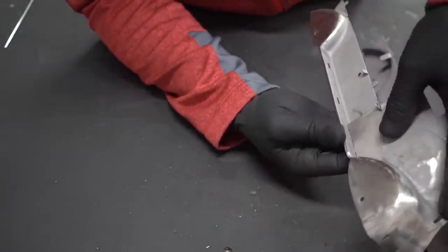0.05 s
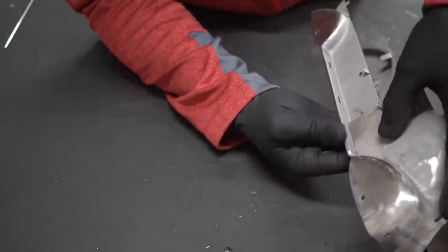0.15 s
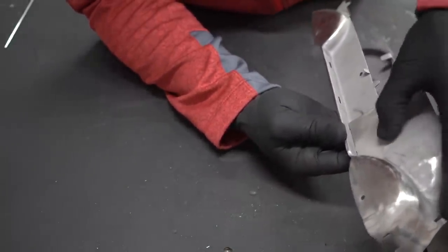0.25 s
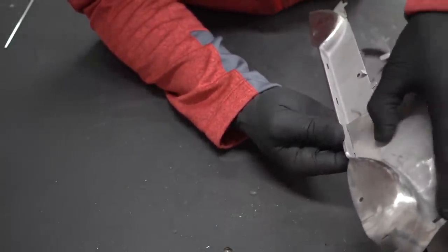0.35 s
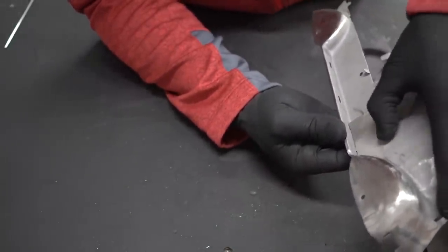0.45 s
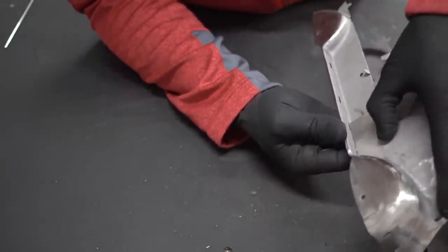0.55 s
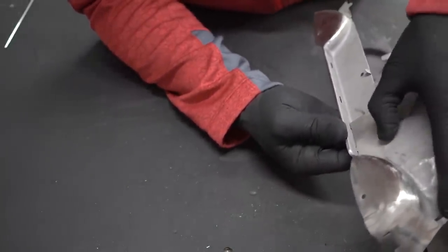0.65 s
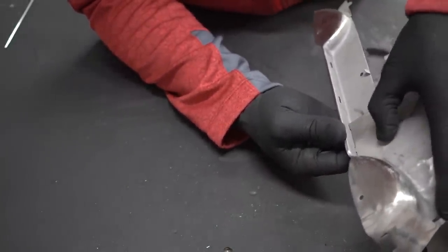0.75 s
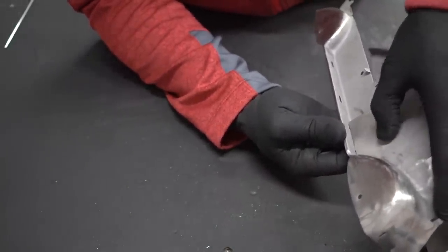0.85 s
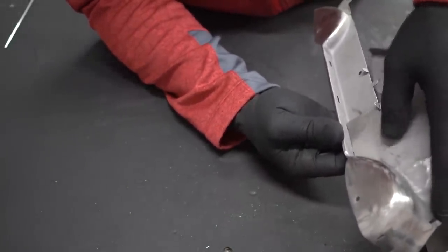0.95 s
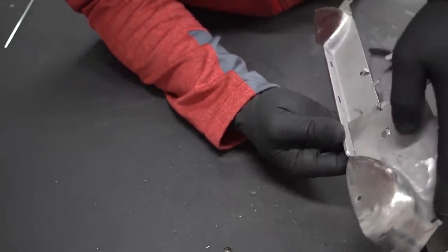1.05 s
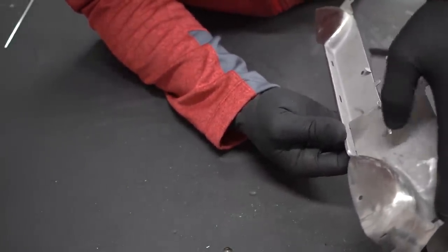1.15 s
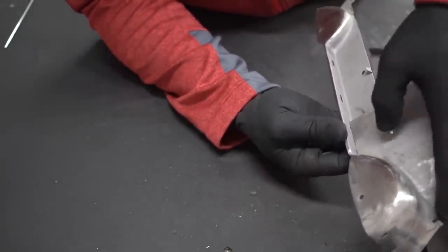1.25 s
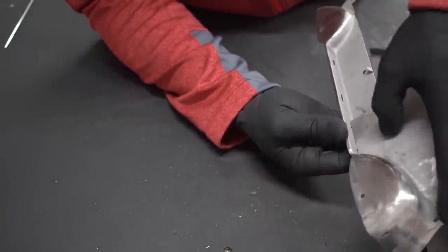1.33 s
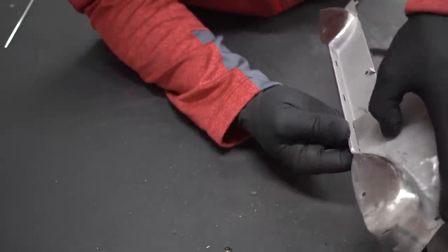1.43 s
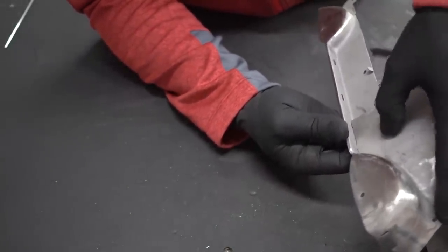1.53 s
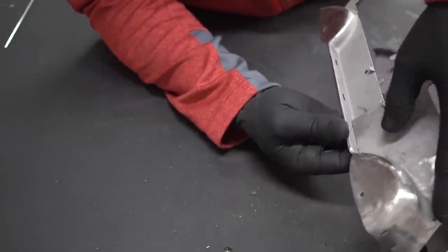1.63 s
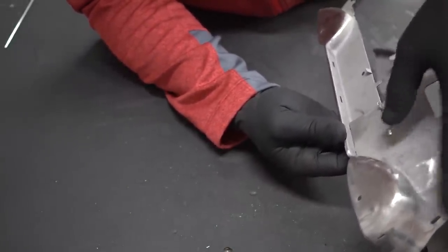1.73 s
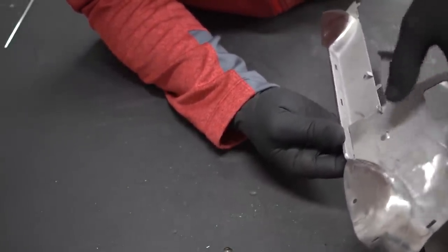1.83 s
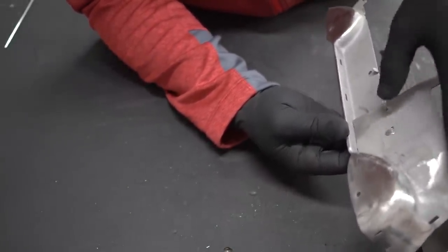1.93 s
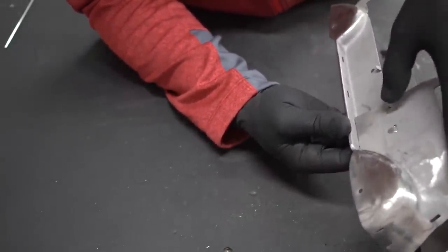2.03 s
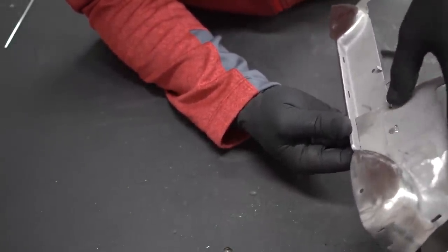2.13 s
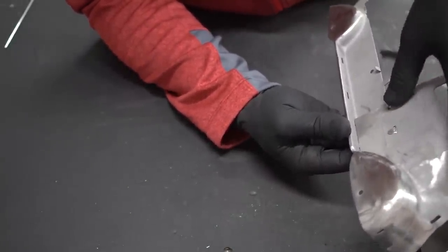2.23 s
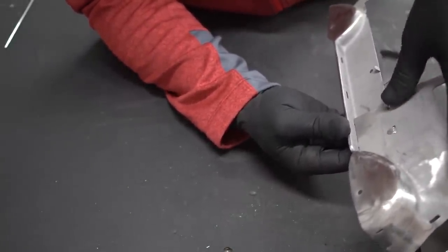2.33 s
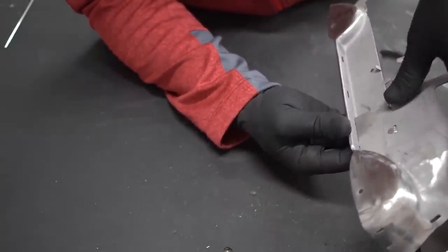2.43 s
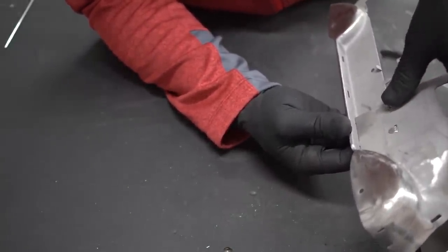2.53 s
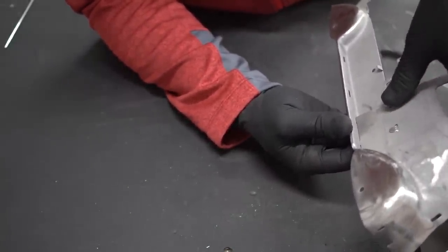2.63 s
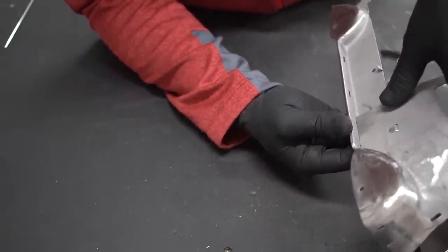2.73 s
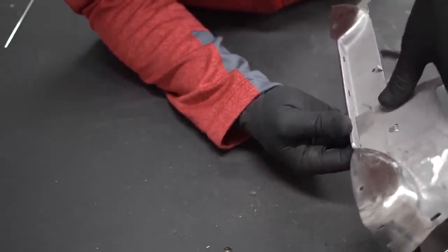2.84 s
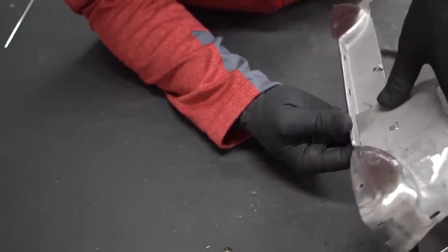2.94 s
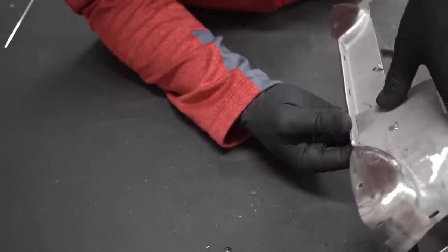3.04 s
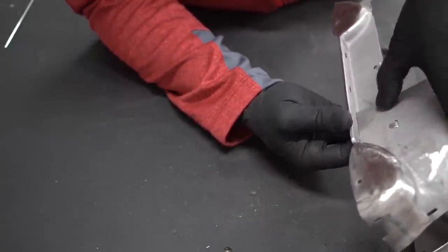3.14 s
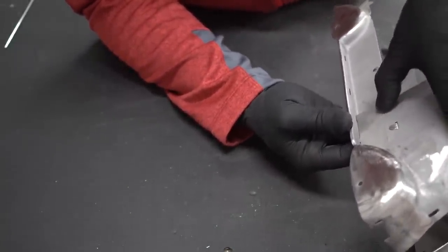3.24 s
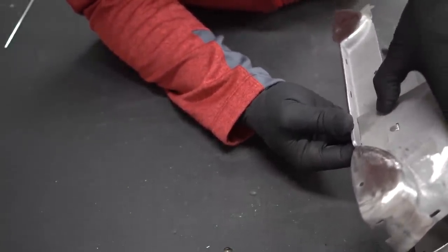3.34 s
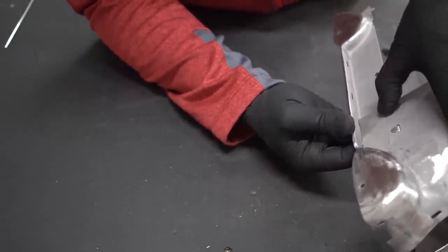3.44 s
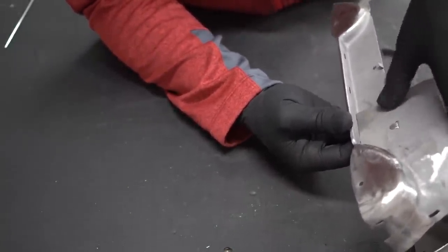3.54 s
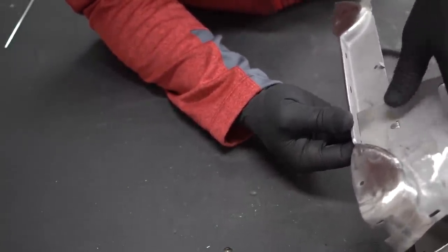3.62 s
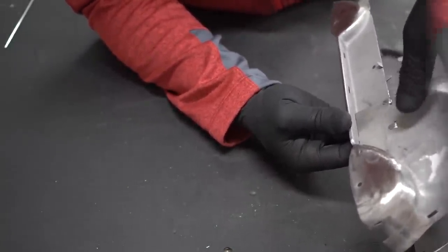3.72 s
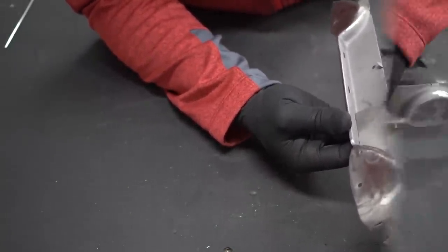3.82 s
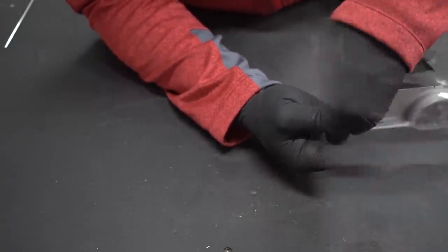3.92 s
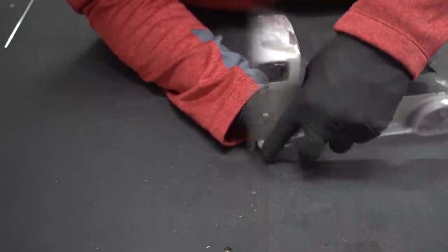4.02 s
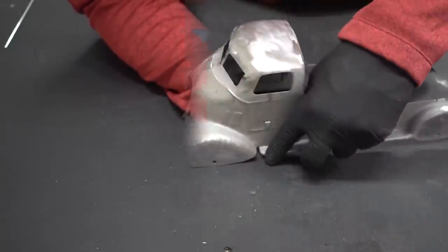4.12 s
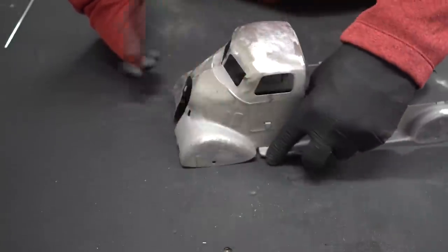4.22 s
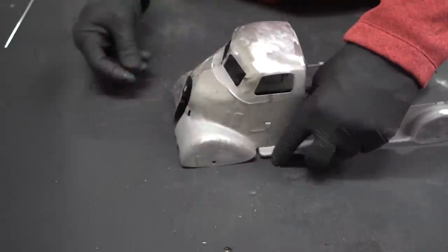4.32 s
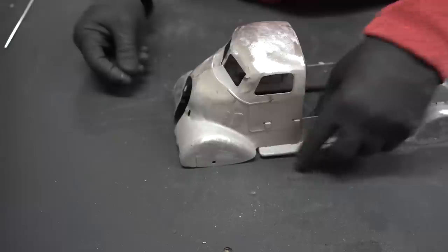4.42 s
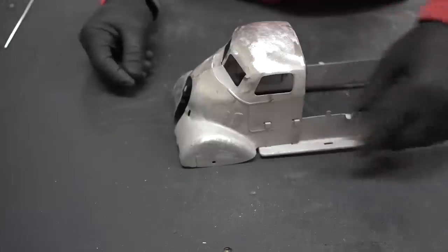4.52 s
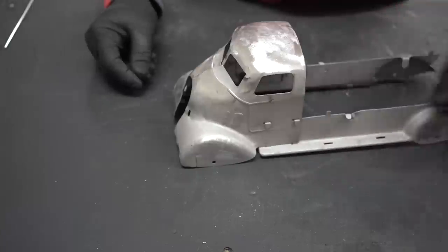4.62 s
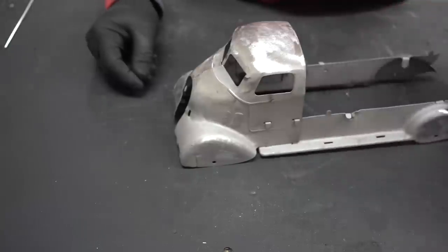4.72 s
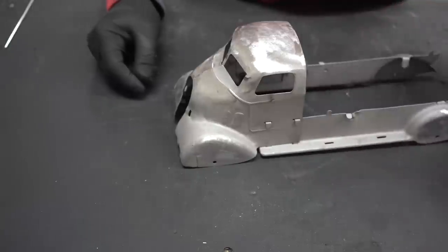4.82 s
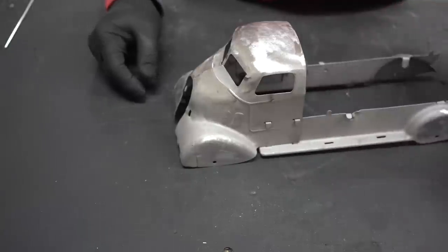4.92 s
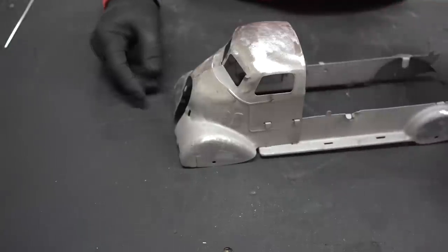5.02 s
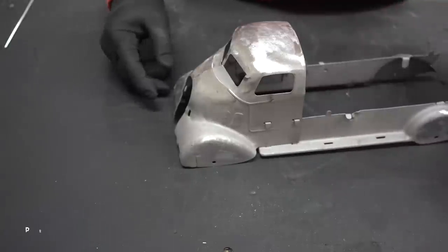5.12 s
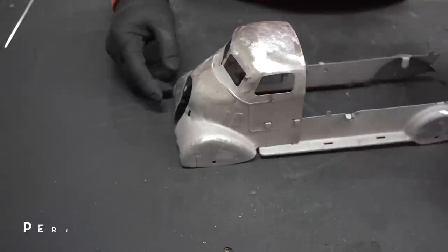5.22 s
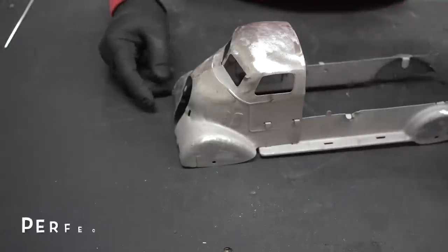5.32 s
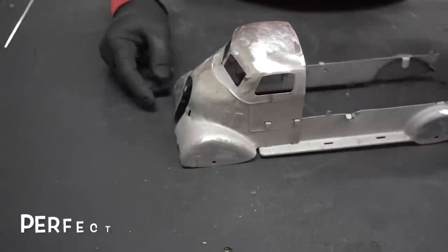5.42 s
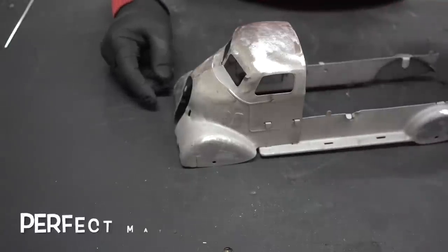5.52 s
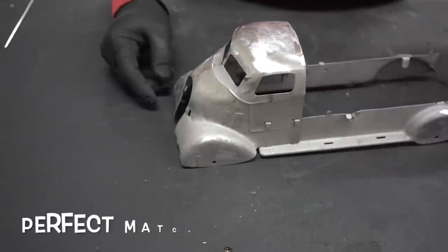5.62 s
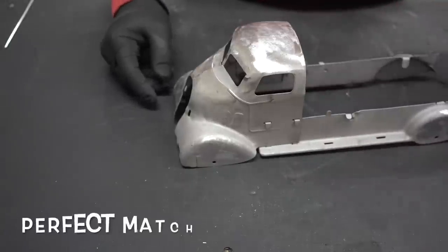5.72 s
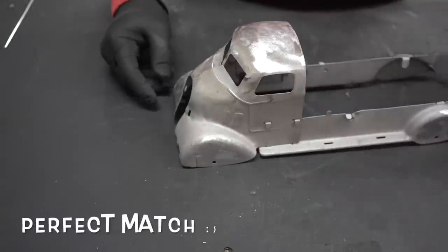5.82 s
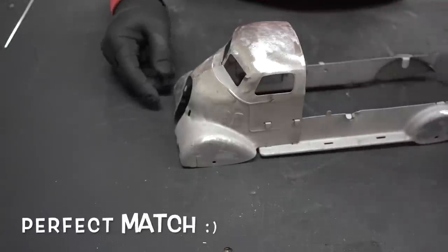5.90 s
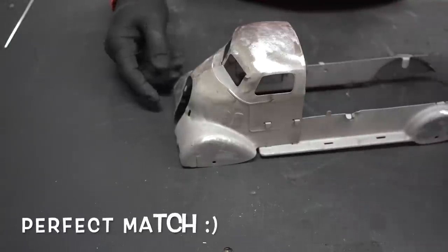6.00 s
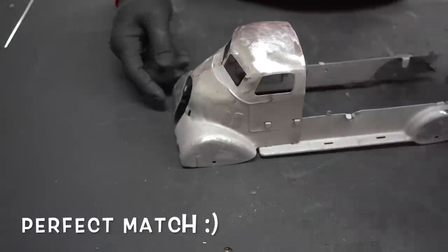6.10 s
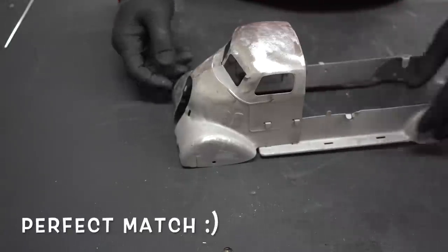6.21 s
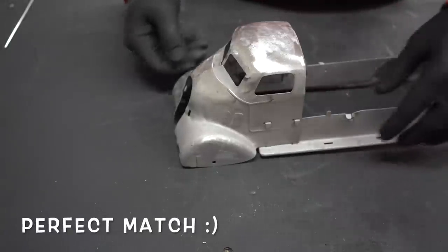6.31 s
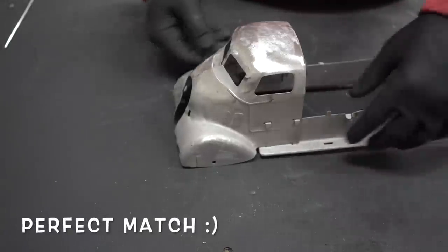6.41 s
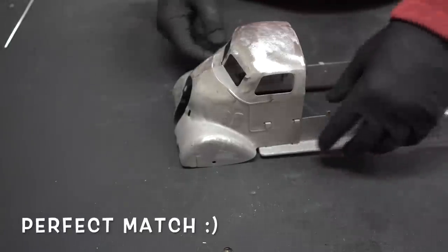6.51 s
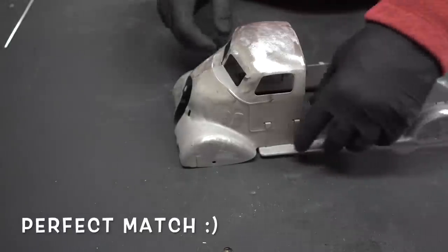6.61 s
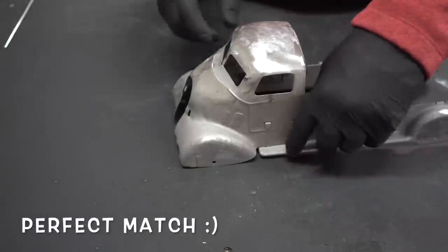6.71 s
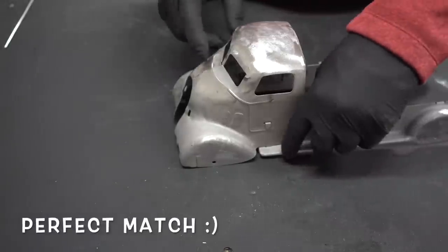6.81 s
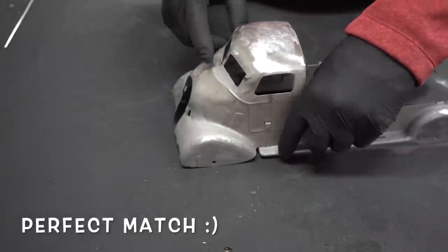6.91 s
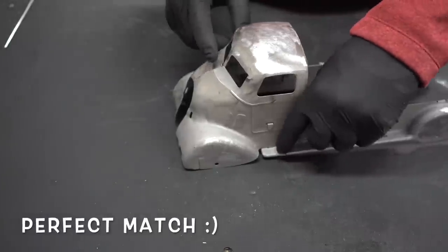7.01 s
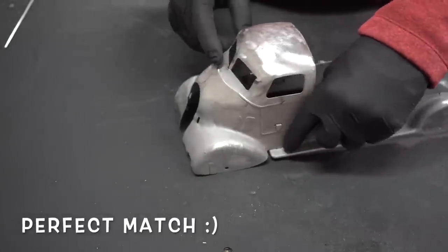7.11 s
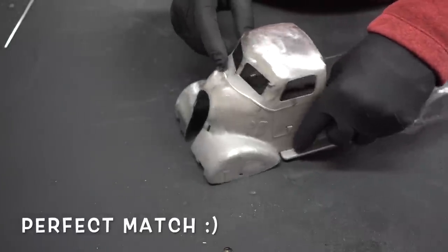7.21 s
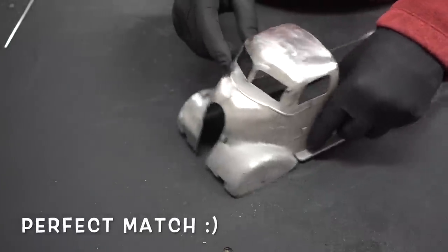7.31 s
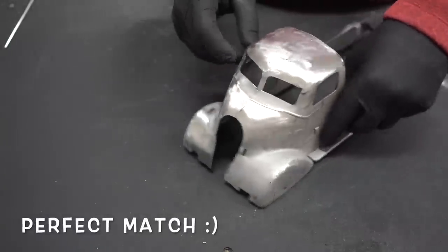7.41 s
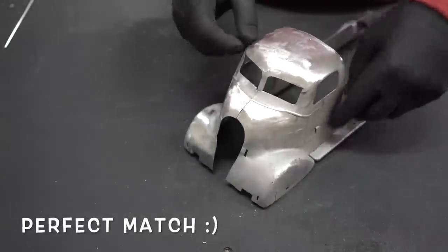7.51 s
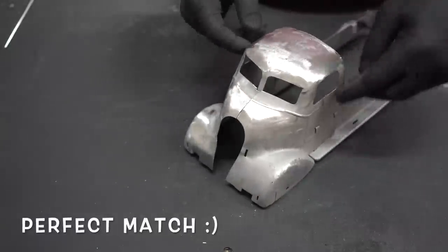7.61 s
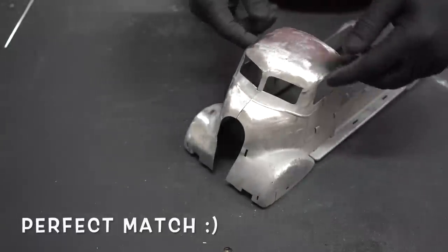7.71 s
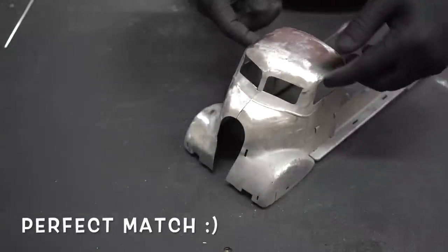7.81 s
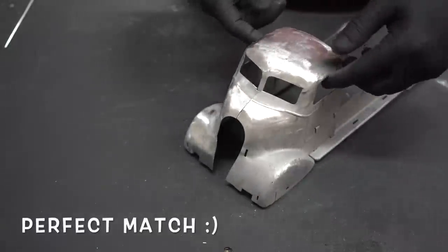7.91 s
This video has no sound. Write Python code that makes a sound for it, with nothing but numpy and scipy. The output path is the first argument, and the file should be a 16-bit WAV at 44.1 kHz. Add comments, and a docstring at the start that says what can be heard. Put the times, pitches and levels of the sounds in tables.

```python
"""Bending a tin truck

Gloved hands bend the tabs of a thin steel toy truck: tabs snap as noise bursts in the bands of the sheet.
The shell flexes, creaks and bumps (slip pulses and thuds); the truck is set down and dragged in jerks.
A heavy steel tool slides over the bench mat and rings against another as a few wavering tones.
A lively workshop answers with a noise tail and a faint hum, heard by a close pair of microphones.
Table levels are relative: each function balances its parts. A t60 is the time to fade by 60 dB."""
import sys
import numpy as np
from scipy import signal
from scipy.fft import rfft, irfft, next_fast_len
from scipy.io import wavfile
from scipy.ndimage import uniform_filter1d, map_coordinates

SR = 44100
rng = np.random.default_rng(int(sys.argv[2]) if len(sys.argv) > 2 else 0)


def to_wav(s):
    """Save 16-bit WAV."""
    ch = np.atleast_2d(s).T  # columns
    pcm = np.round(np.clip(ch, -1, 1) * 32767)  # PCM
    wavfile.write(sys.argv[1], SR, pcm.astype(np.int16))


N = 350595  # length of the scene [samples]


def amp(db):
    """Turn decibels into a gain."""
    return 10 ** (np.asarray(db) / 20)


def unit(x):
    """Scale a sound to an rms of 1."""
    return x / np.sqrt(np.mean(x ** 2) + 1e-20)


def along(points, hz):
    """Read a curve of (frequency, value) points on a logarithmic frequency axis."""
    point_hz, values = np.transpose(points)
    return np.interp(np.log(hz + 1), np.log(point_hz), values)


def filtered(x, response):
    """Multiply the spectrum of x by a function of frequency."""
    n = x.shape[-1]
    padded = next_fast_len(n + 8192)  # spare silence, so that the end does not spill into the start
    spectrum = rfft(x, padded) * response(np.fft.rfftfreq(padded, 1 / SR))
    return irfft(spectrum, padded)[..., :n]


def coloured(x, tone):
    """Give x the tone colour of a table, at rms 1."""
    return unit(filtered(x, lambda f: amp(along(tone, f))))


def resonated(x, modes):
    """Let x excite (frequency, width, level) resonances with alternating signs, at rms 1."""
    def response(f):
        total = 0
        for k, (hz, width, db) in enumerate(modes):
            damping = 1j * f * width
            total = total + (-1) ** k * amp(db) * damping / (hz * hz - f * f + damping)
        return total
    return unit(filtered(x, response))


def band(x, low_hz, high_hz):
    """Keep only the frequencies between two limits, with gentle edges."""
    return signal.sosfilt(signal.butter(2, [low_hz, high_hz], "band", fs=SR, output="sos"), x)


def radiated(x, low_hz):
    """The bench top is too small to radiate deep bass."""
    return signal.sosfilt(signal.butter(6, low_hz, "high", fs=SR, output="sos"), x)


def slips(rate, spread_db, size=N):
    """Stick-slip: tiny pulses of uneven size at random moments, on average rate a second."""
    chance, strength = rng.random(size), rng.standard_normal(size)
    heights = amp(spread_db * np.clip(strength, -2, 2))
    signs = rng.choice([-1, 1], size)
    return unit((chance < rate / SR) * heights * signs)


def wobble(rate):
    """A smooth random curve through rate random points a second."""
    points = rng.standard_normal(int(N * rate / SR) + 4)
    return map_coordinates(points, [np.arange(N) * rate / SR], mode="mirror")


def add(track, s, sound):
    """Mix a sound into a track at time s."""
    i = round(s * SR)
    track[..., i:i + sound.shape[-1]] += sound[..., :N - i]


def panned(x, pan_db):
    """Place a sound between left and right; pan_db is how much louder the left is."""
    return x * amp([[pan_db / 2], [-pan_db / 2]])


def roaming(x, patchy_db):
    """As the contact moves, it favours now some resonances and now others."""
    z = signal.stft(x, nperseg=512)[2]
    patches = rng.standard_normal(z.shape[-2:])
    patches = uniform_filter1d(patches, size=4, axis=0)  # smooth over frequency
    patches = uniform_filter1d(patches, size=7, axis=1)  # smooth over time
    moved = signal.istft(z * amp(patchy_db * unit(patches)), nperseg=512)[1][..., :N]
    return x.std() * unit(moved)


ATTACK_S = 0.013  # a hand takes this long to set the steel moving


def stroke(t, length, release_s):
    """One move of a hand, t seconds after its start: attack, hold, then a release with this t60."""
    return np.clip(t / ATTACK_S, 0, 1) * amp(-60 * np.maximum(t - length, 0) / release_s)


def strokes(rows, release_s, slope_db=0):
    """The gain of (time, length, level) moves that change by slope_db a second while held."""
    power, t = np.zeros(N), np.arange(SR) / SR
    for s, length, db in rows:
        level = amp(db + slope_db * np.minimum(t, length))
        add(power, s, (level * stroke(t, length, release_s)) ** 2)
    return np.sqrt(power)


# how alike diffuse sound is at left and right: (frequency [Hz], likeness [1 = the same])
ALIKE = [(25, 1), (60, .995), (125, 1), (280, 0.97), (550, 0.73), (1200, 0.38), (4000, 0), (12000, 0)]


def diffuse(pair):
    """Two unrelated signals become left and right, alike in the bass."""
    def shares(f):
        turn = np.arccos(np.clip(along(ALIKE, f), -1, 1)) / 2
        return np.array([np.cos(turn), np.sin(turn)])
    mid, side = filtered(pair, shares)
    return np.array([mid + side, mid - side])


# how long the workshop rings: (frequency [Hz], t60 [s])
ROOM = [(100, 0.65), (260, 0.55), (700, 0.85), (1840, 0.73), (4850, 0.61), (12800, 0.41)]
# the cluttered wall behind the bench: (delay [s], spread [s], twice its strength over the tail [ratio])
WALL = (0.0081, 0.0026, 2)


def in_room(x, wet_db, lag=0):
    """Direct sound, a wall echo and a fading noise tail; the left microphone hears it lag seconds late."""
    hz, t, z = signal.stft(rng.standard_normal((2, SR)), SR, nperseg=256)
    fading = z * amp(-60 * t / along(ROOM, hz)[:, None])
    tail = diffuse(signal.istft(fading, SR, nperseg=256)[1])
    age = np.arange(tail.shape[1]) / SR
    delay, spread, strength = WALL
    build_up = 1 - np.exp(-age / 0.0058)
    wall_echo = strength * np.exp(-((age - delay) / spread) ** 2) / 2
    tail = tail * (build_up + wall_echo)
    tail = tail / np.linalg.norm(tail[0])
    source = np.atleast_2d(x).mean(axis=0)
    heard = x + amp(wet_db) * signal.fftconvolve(source[None], tail, axes=1)[:, :N]
    sides = np.array([[-1], [1]])  # half the lag delays the left, half advances the right
    return filtered(heard, lambda f: np.exp(1j * np.pi * f * lag * sides))


# tone of the quiet workshop: (frequency [Hz], level [dB])
AIR_TONE = [(12, -56.5), (20, -4.5), (107, 1.5), (193, -9), (248, 0.5), (319, -10), (367, -6.5),
            (446, -14.5), (780, -12.5), (1190, -16.5), (1400, -16.5), (2910, -20), (12800, -25.5),
            (14700, -26), (16000, -28)]


def air():
    """The quiet workshop: soft noise all around and a faint machine hum of three narrow resonances."""
    hum_modes = [(60.0, 3.8, -9), (142.5, 4.5, 2.0), (244.3, 7.1, 4.0)]  # (Hz, width Hz, dB)
    hum = resonated(rng.standard_normal(N), hum_modes)
    hush = coloured(diffuse(rng.standard_normal((2, N))), AIR_TONE)
    return amp(-53) * hush + amp(-66) * hum


# brief thin, high hisses of a glove or sleeve brushing past: (time [s], length [s], level [dB])
SWISHES = [(.265, .012, -58), (5.44, .025, -53), (5.595, 0.06, -48)]


def high_hisses():
    """Light rubbing of a glove or sleeve makes many tiny slips, heard as a thin, high hiss."""
    touch = strokes(SWISHES, release_s=0.1)
    swish = unit(band(slips(rate=3600, spread_db=10), 7400, 21000))
    return in_room(touch * swish, wet_db=1)


# the small bending tool brushing the mat as it is put aside: (time [s], length [s], level [dB])
SET_ASIDE = [(4.735, 0.081, -54), (4.815, 0.022, -46.5)]
# resonances of that tool: (frequency [Hz], width [Hz], level [dB])
SMALL_TOOL = [(2120, 91, -2), (3430, 31, -1), (4516, 23, 3), (5000, 40, -2), (5450, 25, -2), (9060, 55, -3),
              (10440, 63, -1), (12150, 65, -16), (14800, 200, -10)]
# steel rubbing on steel: (time [s], length at half height [s], frequency [Hz], level [dB])
SQUEAKS = [(0.218, 0.018, 3120, -60), (2.47, 0.16, 2460, -66.5), (2.627, 0.041, 3020, -64.5),
           (3.888, 0.026, 4200, -47), (4.173, 0.22, 5510, -59), (7.234, 0.021, 6500, -25)]


def light_steel():
    """Brief squeaks of the shell in narrow bands, and the bending tool singing faintly as it is put aside."""
    touch = strokes(SET_ASIDE, release_s=0.26)
    out = touch * resonated(slips(rate=1600, spread_db=8), SMALL_TOOL)
    for s, length, hz, db in SQUEAKS:
        swell = np.hanning(round(2 * length * SR))
        squeak = resonated(rng.standard_normal(len(swell)), [(hz, 5 / length, 0)])
        add(out, s - length / 2, amp(db) * swell * squeak)
    return in_room(out, wet_db=-7.5)


# hands pressing on the shell so that it flexes: (time [s], length [s], level [dB])
PRESSES = [(0.0, .03, -43.5), (.33, 0.14, -50), (.83, 0.077, -43), (1.01, 0.057, -48.5),
           (1.27, 0.049, -45.5), (1.42, 0.055, -40.5), (1.55, 0.12, -42.5), (1.84, 0.056, -31.5),
           (2.0, 0.037, -43.5), (2.21, .04, -44), (2.36, 0.038, -49.5), (2.54, 0.035, -52),
           (2.73, 0.022, -59), (3.36, 0.074, -63), (3.53, 0.15, -41.5), (4.03, .05, -40),
           (4.76, 0.025, -47), (4.97, 0.048, -47.5), (5.23, 0.12, -58)]
# tone of the flexing shell: (frequency [Hz], level [dB])
FLEX_TONE = [(41, -46), (70, -55.5), (96, -48), (114, 14.5), (125, 2.5), (166, -11.5), (240, -4),
             (286, -18.5), (329, -7.5), (500, -15), (650, -61), (1100, -120)]
# glove and tool rubbing on the steel, and at 3.631 s a tab rattling as it slides free:
# (time [s], length [s], panel level [dB], hiss level [dB], panel pitch at that moment [ratio])
RUBS = [(0.761, 0.066, -45.5, -47.5, 1.16), (0.849, .012, -40, -43, 1), (1.023, 0.044, -49, -75, 1.15),
        (1.559, 0.036, -43, -48.5, 0.85), (1.592, 0.041, -42, -38, 1.93), (1.658, .12, -48.5, -50.5, 1.65),
        (1.782, .012, -41, -53, 0.51), (1.807, 0.013, -37, -44, 0.49), (1.83, 0.04, -49, -49, 1.14),
        (1.881, 0.11, -51.5, -55, 1.24), (2.175, 0.035, -53, -47, 1.1), (2.589, 0.059, -63, -55.5, 0.98),
        (2.918, 0.056, -49.5, -59, 1.04), (3.099, 0.017, -50, -44, 0.93), (3.151, .14, -53, -69, 1.18),
        (3.631, 0.089, -40, -33, 2.1), (4.817, 0.044, -48.5, -49, 0.96), (4.984, .03, -50.5, -60, 0.99),
        (5.061, 0.11, -63.5, -63, 1.38), (6.832, 0.15, -65, -55.5, 1.01), (7.015, 0.095, -39.5, -49, .85),
        (7.882, 0.046, -65, -51.5, 1.2)]
# tone of the rubbing hiss: (frequency [Hz], level [dB])
HISS_TONE = [(1200, -32), (2500, 0.5), (4000, 9.5), (7000, 12), (12000, 9.5), (16000, 5)]
# resonances of the truck's broad panels, also heard in the bumps: (frequency [Hz], width [Hz], level [dB])
PANEL = [(371, 110, 10), (740, 71, 13.5), (917, 26, 4), (1270, 190, 3.5), (1650, 41, -0.5),
         (2396, 140, 1.5)]
# resonances of the truck's steel, also heard in drag and snaps: (frequency [Hz], width [Hz], level [dB])
TIN = [(2060, 190, -11.5), (3313, 79, 2.5), (3580, 36, 6), (4140, 360, 2), (5100, 54, -6), (6440, 45, 3),
       (7220, 320, -2), (8140, 99, 4.5), (9300, 67, -5), (11800, 660, -4)]
PRESS_RELEASE_S, RUB_RELEASE_S = 0.27, 0.098  # t60 as the hand eases off
# between presses the hands are never quite still
HOLD_UNTIL_S, HOLD_DB, FIDGET_DB, FIDGETS_PER_S = 4.3, -62, 8, 6.7


def handling():
    """Pressure rocks the shell; glove and tool rub panels that each grip tunes anew; one tab rattles free."""
    t = np.arange(N) / SR
    unsteady = amp(HOLD_DB + FIDGET_DB * wobble(FIDGETS_PER_S))
    holding = unsteady * stroke(t, HOLD_UNTIL_S, PRESS_RELEASE_S)
    flex = np.hypot(holding, strokes(PRESSES, PRESS_RELEASE_S))
    rocking = flex * coloured(slips(rate=360, spread_db=0.5), FLEX_TONE)
    creak, short_t = np.zeros(N), t[:SR // 2]
    for s, length, panel_db, _, ratio in RUBS:
        gripped = [(hz * ratio, width, db) for hz, width, db in PANEL]
        panels = resonated(slips(rate=700, spread_db=2.5, size=len(short_t)), gripped)
        add(creak, s, amp(panel_db) * stroke(short_t, length, RUB_RELEASE_S) * panels)
    hiss = strokes([(s, length, db) for s, length, _, db, _ in RUBS], RUB_RELEASE_S)
    grit = slips(rate=2700, spread_db=8)
    rub = hiss * (coloured(grit, HISS_TONE) + amp(-4.5) * resonated(grit, TIN))
    return in_room(rocking + creak + rub, wet_db=-3.0, lag=6e-5)


# dull bumps of the shell; the one at 0.772 s is the onset of a creak:
# (time [s], level [dB], rattle level [dB], centre [Hz], t60 [s])
BUMPS = [(0.324, -35.5, -2, 430, 0.086), (0.772, -31, -14, 404, 0.19), (0.852, -29.5, -1, 136, 0.078),
         (1.018, -14.5, -29, 330, 0.034), (1.416, -29, -10.5, 117, 0.13), (1.828, -18.5, -17.5, 119, 0.11),
         (2.12, -34.5, 4, 423, 0.043), (3.108, -34, -9, 158, 0.28), (3.202, -29.5, -12, 129, 0.1),
         (3.529, -34.5, 5, 114, 0.077), (4.02, -23, -7, 340, 0.03), (4.034, -27, -7, 267, 0.17),
         (4.145, -20.5, -17, 247, 0.2), (4.823, -29.5, -34, 119, 0.07), (7.199, -24, 2, 395, 0.18),
         (7.298, -29.5, 8, 273, 0.3), (7.542, -23.5, -8.5, 274.4, 0.38), (7.778, -18, -23, 161, 0.023)]


def bumps():
    """Dull bumps of the shell, one of them a creak's onset: a low push, a thud and a short panel rattle."""
    out, t = np.zeros(N), np.arange(SR // 2) / SR
    for s, db, rattle_db, hz, t60 in BUMPS:
        fade = amp(-60 * t / t60) * (1 - np.exp(-t / 0.0011))  # a softened onset
        noise = rng.standard_normal((3, len(t)))
        thud = unit(band(noise[0], max(hz * 0.5, 110), max(hz * 1.76, 340)))
        rattle = unit(band(noise[1], 290, 2500)) + amp(-3) * resonated(noise[2], PANEL)
        push = np.sin(2 * np.pi * hz * t)
        add(out, s, amp(db - 3) * fade * (push + amp(-3.5) * thud + amp(rattle_db) * rattle))
    return in_room(radiated(out, low_hz=90), wet_db=0, lag=6e-5)


# tone of the tool's judder over the bench: (frequency [Hz], level [dB])
SLIDE_TONE = [(44, -46), (75, -32), (119, -2.5), (200, -5), (271, 0), (461, -6.5), (606, -7), (925, -13.5),
              (1600, -16.5), (3000, -32.5), (6000, -37.5), (7800, -58), (13200, -120)]
# tone of steel on the mat: (frequency [Hz], level [dB])
GRIT_TONE = [(900, -4), (2000, 11.5), (3500, 7), (6000, 0), (10000, -7), (16000, -11)]
# short bright bursts of the sliding tool; the last is the crack of its strike:
# (time [s], length [s], level [dB])
BRIGHT_BURSTS = [(5.662, 0.013, -29), (5.715, 0.04, -39.5), (5.84, 0.0083, -27)]
# the slide gathers speed until the tool strikes
SLIDE_S, SLIDE_LENGTH_S = 5.44, 0.4
SLIDE_DB, SLIDE_GROWS_DB_PER_S = -42, 44.5  # judder
GRIT_DB, GRIT_GROWS_DB_PER_S = -52, 22  # hiss of the mat
TOOL_LAG_S = 1.18e-4  # the tool lies to the right: it reaches the left microphone this much later


def tool_slide():
    """A heavy steel tool slips over the mat, louder as it gathers speed, up to the crack of its strike."""
    judder = strokes([(SLIDE_S, SLIDE_LENGTH_S, SLIDE_DB)], 0.092, SLIDE_GROWS_DB_PER_S)
    hiss = strokes([(SLIDE_S, SLIDE_LENGTH_S, GRIT_DB)], 0.08, GRIT_GROWS_DB_PER_S)
    hiss = np.hypot(hiss, strokes(BRIGHT_BURSTS, release_s=0.044))
    drum_modes = [(117.3, 14, 0.26), (593, 30, -6.2)]  # the bench top drums: (Hz, width Hz, dB)
    drum = resonated(slips(rate=730, spread_db=6), drum_modes)
    body = judder * (coloured(slips(rate=1200, spread_db=2.0), SLIDE_TONE) + amp(-9.5) * drum)
    grit = hiss * roaming(coloured(slips(rate=2000, spread_db=6), GRIT_TONE), patchy_db=2.0)
    return in_room(body + grit, wet_db=1.0, lag=TOOL_LAG_S)


# the strike, a bounce, and an early echo: (time [s], level [dB])
CLINKS = [(5.845, -8), (5.852, -16.5), (5.86, -21)]
# the tool's ringing modes: (frequency [Hz], lasting level [dB], first level [dB], lasting t60 [s],
# wavering depth [0-1], wavering rate [per s], left over right [dB])
TOOL = [(1965, -26.5, -33, 0.73, 0.7, 59, 1.5), (4870, -22, -4, 1.42, 0.11, 12.6, 3.5),
        (9469, -17.5, -45, 0.58, 0.42, 23.3, -8.5), (15230, -37, -36, 0.38, 0.5, 23, 0)]
FIRST_T60_S = 0.25  # the first part of each mode dies quickly against the mat


def tool_ring():
    """A strike, a bounce and an early echo click; the bar modes ring on, wavering as reflections mix in."""
    clink, ring, t = np.zeros((2, N)), np.zeros((2, N)), np.arange(3 * SR // 2) / SR
    arrival = t + TOOL_LAG_S / 2 * np.array([[-1], [1]])
    for s, db in CLINKS:
        click = band(rng.standard_normal((2, len(t))), 3400, 9900)
        add(clink, s, amp(db - 60 * t / 0.01) * click)
    for hz, db, first_db, t60, waver, rate, pan_db in TOOL:
        knots = rng.standard_normal((4, 128))
        a, b, c, d = [map_coordinates(k, [t * rate], mode="mirror") for k in knots]
        paths = 1 + waver * np.array([a + 1j * b, c + 1j * d])  # direct sound plus drifting reflections
        level = amp(db - 60 * t / t60) + amp(first_db - 60 * t / FIRST_T60_S)
        level = level * (1 - np.exp(-t / 0.024))
        tone = np.imag(paths * np.exp(2j * np.pi * hz * arrival))
        add(ring, CLINKS[0][0], panned(level * tone, pan_db))
    return in_room(clink, wet_db=3) + ring


# shoves that set the truck down and drag it round:
# (time [s], length [s], judder level [dB], edge chatter level [dB], judder release t60 [s])
SHOVES = [(4.02, 0.063, -27.5, -38, 0.44), (4.149, 0.017, -24, -33, 0.48), (4.354, 0.099, -58, -56, .3),
          (7.008, 0.096, -30.5, -42.5, .3), (7.099, 0.063, -17.5, -38, 0.47),
          (7.139, 0.15, -13.5, -23, 0.25), (7.271, .11, -21, -27, .3), (7.399, .075, -13, -21, 0.38),
          (7.494, 0.053, -16, -43, .25), (7.784, 0.023, -36, -53, 0.15)]
# resonances of the truck standing on the bench: (frequency [Hz], width [Hz], level [dB])
BENCH = [(114, 32, -9.5), (267.6, 17.5, 5), (317.6, 13, 2), (375.6, 19.5, 4), (494, 118, -5.5),
         (611, 31, 0.5), (775, 15, 0.5), (837, 9.4, 2), (909, 10.6, -1), (1089, 25, -5), (1220, 6.4, -26)]
# tone of the dragged body: (frequency [Hz], level [dB])
DRAG_TONE = [(41, -58), (70, -35), (109, 8), (174, 2), (371, -3.5), (729, 0.5), (788, -5.5), (1150, -2.5),
             (1500, -8.5), (3000, -22), (3900, -13.5), (6600, -120)]
# tone of the chattering edges: (frequency [Hz], level [dB])
CHATTER_TONE = [(880, -41), (1600, -1), (2720, -1.5), (3220, 0), (3480, -3), (4200, 0.5), (5380, -4.5),
                (6370, -0.5), (6760, -3), (13900, -12.5), (16000, -22.5)]
SAG_DB_PER_S = 20  # a shove weakens once the truck moves
CHATTER_RELEASE_S = 0.14  # t60: the edges fall quiet before the body does


def truck_drag():
    """The truck judders over the mat in stick-slip jerks; its loose edges chatter with every slip."""
    shoves = [strokes([(s, length, db)], t60, -SAG_DB_PER_S) for s, length, db, _, t60 in SHOVES]
    judder = np.linalg.norm(shoves, axis=0)
    chatter = strokes([(s, length, db) for s, length, _, db, _ in SHOVES], CHATTER_RELEASE_S, -SAG_DB_PER_S)
    chatter = chatter * amp(2.3 * wobble(rate=50))  # the edges catch and let go
    jerks = slips(rate=700, spread_db=1.5)
    two_contacts = diffuse(np.array([slips(rate=1200, spread_db=3.5), slips(rate=840, spread_db=2)]))
    body = amp(-8.5) * resonated(jerks, BENCH) + amp(-10.5) * coloured(two_contacts, DRAG_TONE)
    contact = signal.lfilter([1], [1, -np.exp(-1 / (0.0036 * SR))], np.abs(jerks))
    grit = (unit(contact) + 1 / 2) * rng.standard_normal((2, N))  # steady rasp with a burst at every slip
    grit = grit + 0.73 * grit[::-1]  # each edge reaches both microphones
    edges = amp(-1.0) * coloured(grit, CHATTER_TONE) + amp(-19) * resonated(grit, TIN)
    body, edges = roaming(body, patchy_db=2.0), roaming(edges, patchy_db=4.5)
    grip = chatter / (chatter + amp(-28.5))  # a light touch is duller than a hard one
    dull = filtered(edges, lambda f: 1 / (1 + (f / 9000) ** 6))
    bright = edges - dull
    edges = chatter * (dull + 2.48 * grip * bright)
    return in_room(radiated(judder * body, low_hz=99) + panned(edges, pan_db=-4.5), wet_db=0.0)


# tabs and edges snapping: (time [s], level [dB], panel level [dB], sharp edge level [dB],
# panel frequency [Hz], bite frequency [Hz], left over right [dB], clatter t60 [s])
SNAPS = [(0.089, -40.5, 5.5, -31, 1500, 2750, -24, 0.012),
         (0.8532, -20.5, -2, -35.5, 950, 2580, -17, 0.015), (0.9822, -39, -1, 4.5, 980, 2760, -14, 0.027),
         (1.2512, -11.5, 1, -9, 940, 3740, -10.5, 0.032), (1.984, -32.5, 7.5, -16, 980, 4530, -9, 0.049),
         (2.1213, -30, -4, -25, 860, 2320, -7, 0.028), (3.172, -31, 1, 1, 750, 9100, -11, 0.018),
         (3.1979, -27.5, -2, -33, 895, 3690, -7, 0.028), (3.263, -28.5, 4, -7, 738, 3100, -8, 0.018),
         (3.5311, -17.5, 0.5, -35, 890, 3900, -16, 0.013), (3.6273, -15, 3.5, 1.5, 830, 4040, -5.5, 0.077),
         (4.04, -23, -14, -13.5, 708, 3570, -2.0, 0.019), (4.068, -23, -12, -21, 775, 3560, 2, 0.016),
         (4.156, -16, 13, -22, 820, 3610, -1.5, 0.016), (4.384, -38.5, 2, -7, 1280, 3030, 0, 0.088),
         (4.5234, -40.5, -1.5, -4, 1210, 6400, -6, 0.14), (7.1462, -16, -18, -17, 789, 4500, -3, 0.046),
         (7.181, -18, -5, -4, 778, 2930, 0, 0.061), (7.304, -12.5, -18, -17, 775, 6160, -5, 0.057),
         (7.4089, -10.5, -4, -16, 842, 3300, -1, 0.055)]


def snaps():
    """A tab gives way with a crack; where it sits decides which panel booms and where the sheet bites."""
    out, t = np.zeros((2, N)), np.arange(SR // 3) / SR
    for s, db, panel_db, edge_db, panel_hz, bite_hz, pan_db, t60 in SNAPS:
        noise = rng.standard_normal((6, 3, len(t)))  # each part of the sheet rattles on its own
        fade = amp(-60 * t / t60) + amp(-7 - 60 * t / 0.0023)  # the clatter plus the brief crack
        attack = 1 - np.exp(-t / 0.00046)
        # one noise shared by both sides, plus one for each side
        burst = (noise[:, :1] + 0.88 * noise[:, 1:]) * fade * attack
        sheet = amp(1) * band(burst[0], 2850, 9600) + amp(edge_db + 3) * band(burst[1], 6700, 14800)
        ring = amp(-6.0) * burst[2].std() * resonated(burst[2], TIN)
        bite = amp(9) * band(burst[3], bite_hz * 0.97, bite_hz * 1.044)
        boom = band(burst[4], 920, 1780) + band(burst[5], panel_hz * 0.906, panel_hz * 1.186)
        panel = amp(panel_db + 5) * boom
        add(out, s, panned(amp(db - 6.5) * (sheet + ring + bite + panel), pan_db))
    return in_room(out, wet_db=0.0, lag=6e-5)


def scene():
    """Everything on the bench, from the quiet workshop to the snapping tabs."""
    background = air() + high_hisses() + light_steel()
    shell = handling() + bumps()
    tool = tool_slide() + tool_ring()
    return background + shell + tool + truck_drag() + snaps()


TOP_HZ = 16000


def record(dry):
    """The recorder keeps nothing above its band limit."""
    return filtered(dry, lambda f: f < TOP_HZ)


dry = scene()
out = record(dry)
to_wav(out)
```